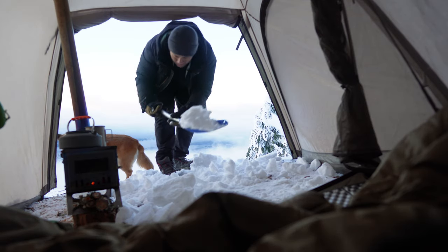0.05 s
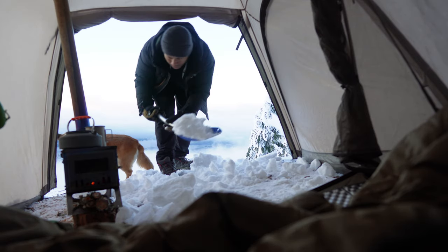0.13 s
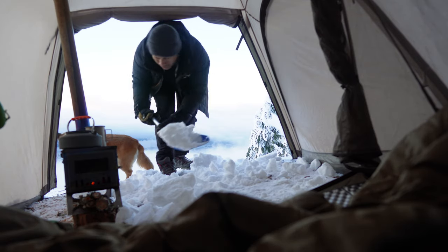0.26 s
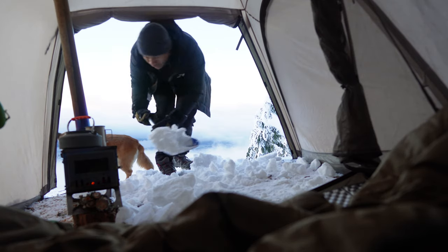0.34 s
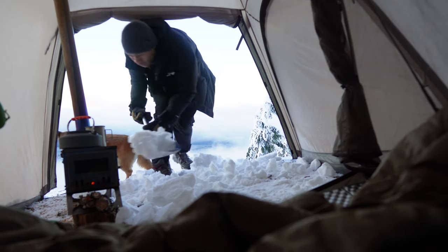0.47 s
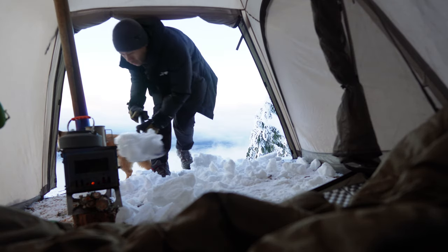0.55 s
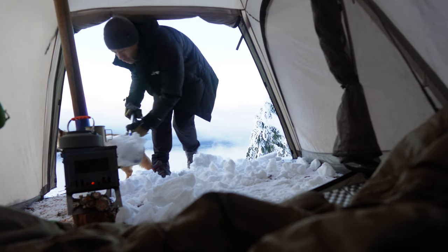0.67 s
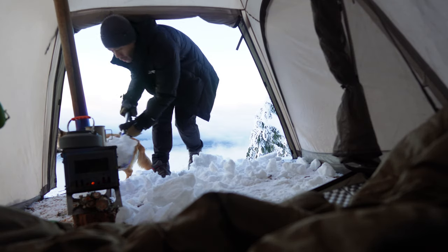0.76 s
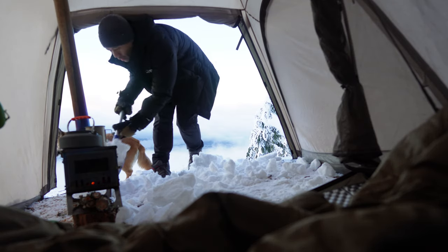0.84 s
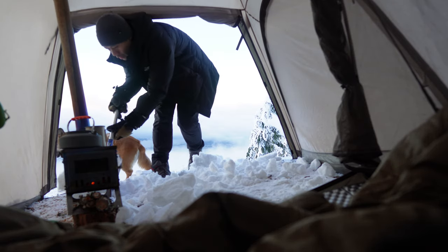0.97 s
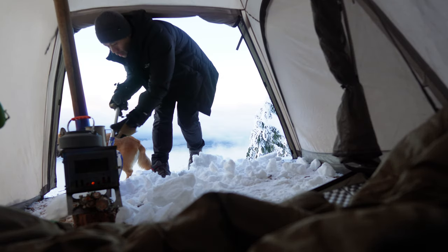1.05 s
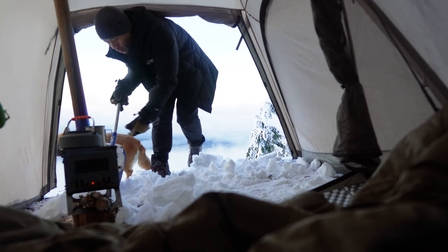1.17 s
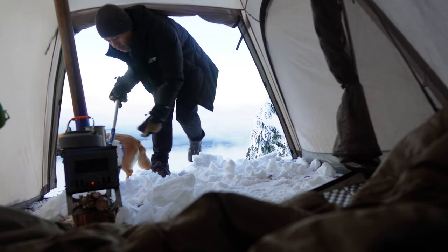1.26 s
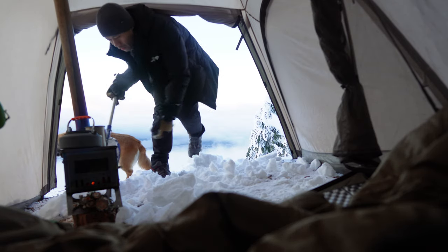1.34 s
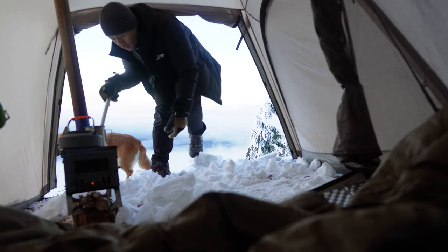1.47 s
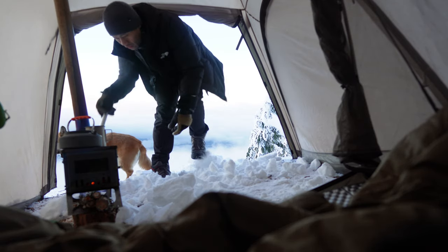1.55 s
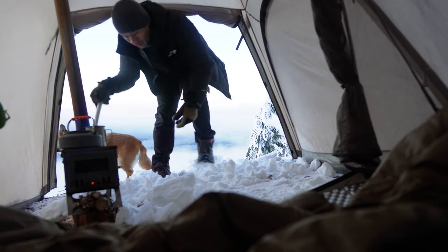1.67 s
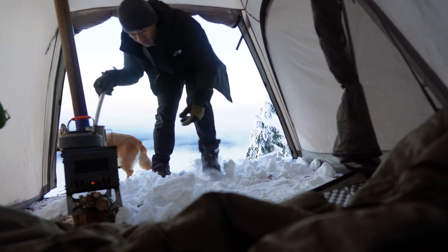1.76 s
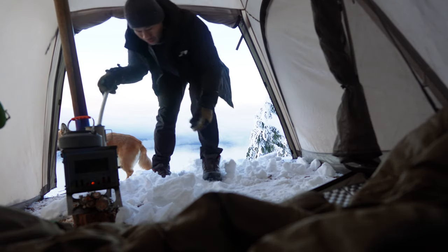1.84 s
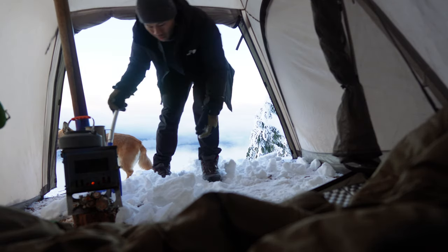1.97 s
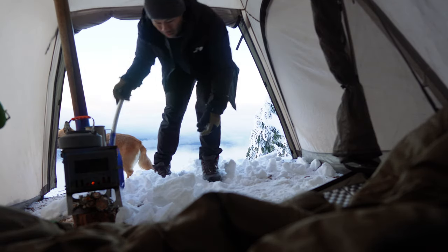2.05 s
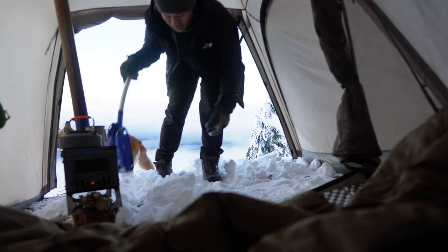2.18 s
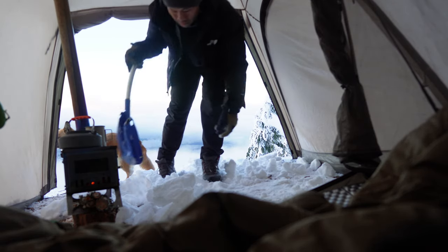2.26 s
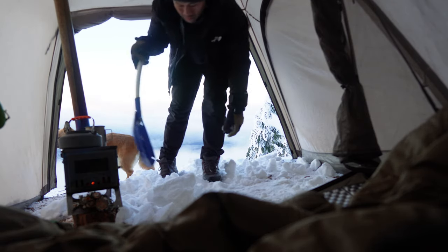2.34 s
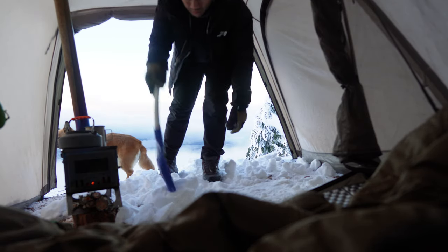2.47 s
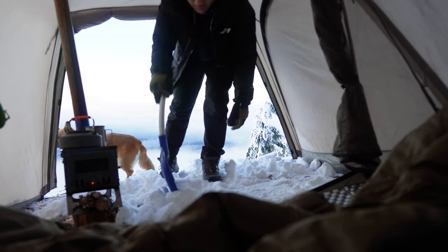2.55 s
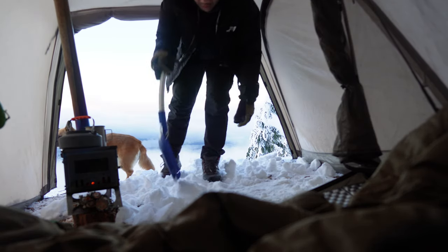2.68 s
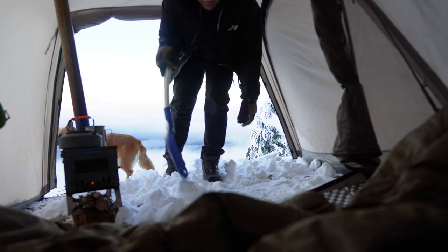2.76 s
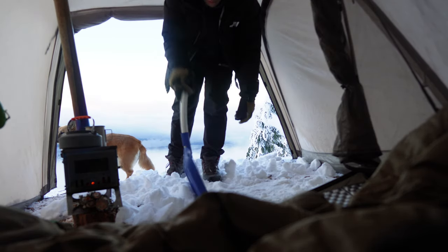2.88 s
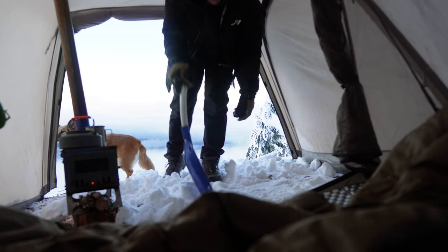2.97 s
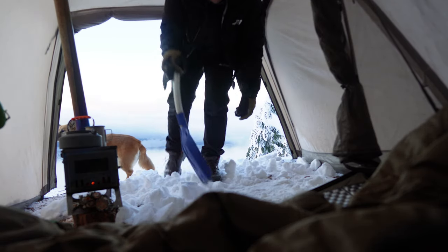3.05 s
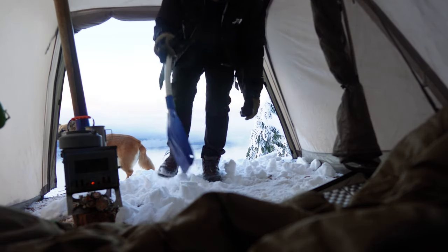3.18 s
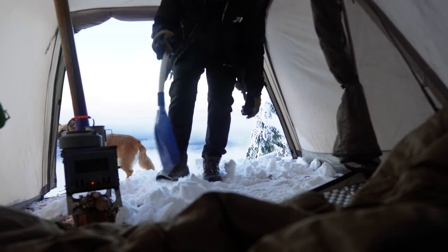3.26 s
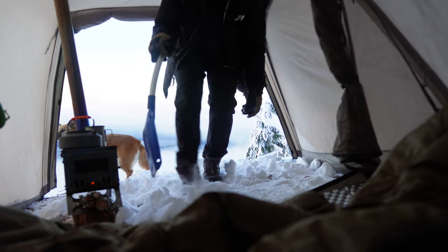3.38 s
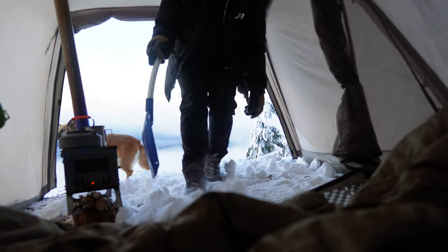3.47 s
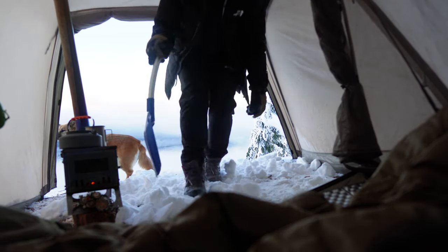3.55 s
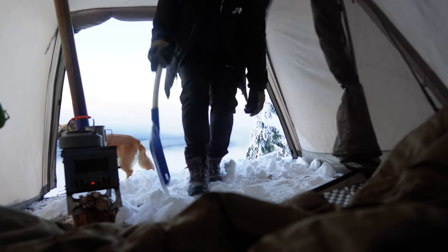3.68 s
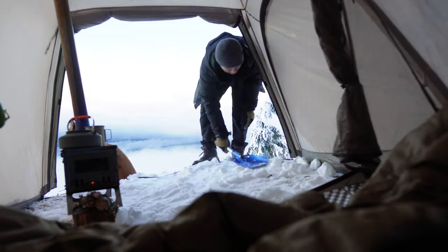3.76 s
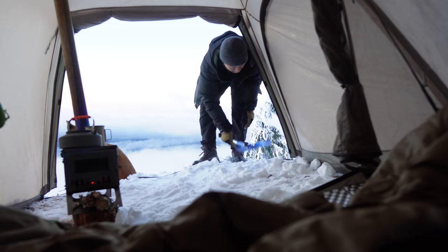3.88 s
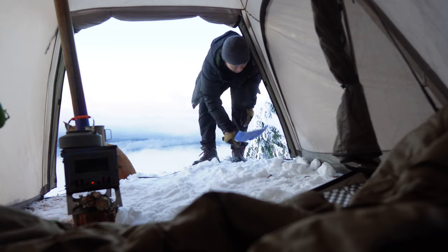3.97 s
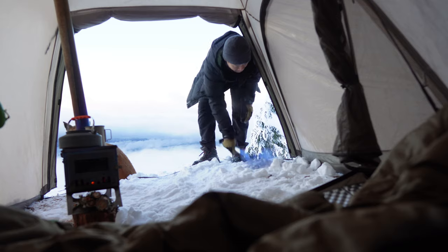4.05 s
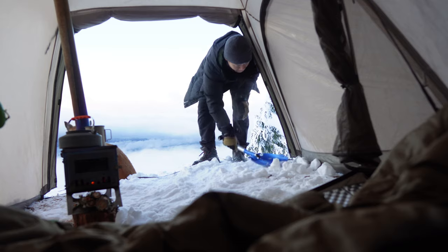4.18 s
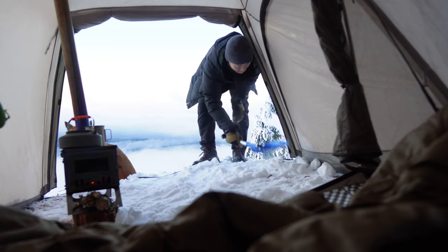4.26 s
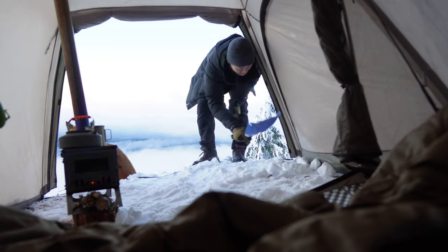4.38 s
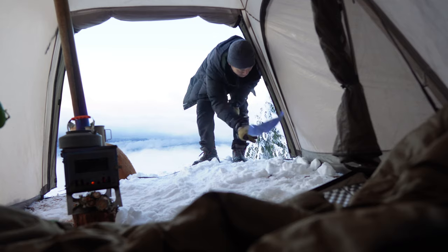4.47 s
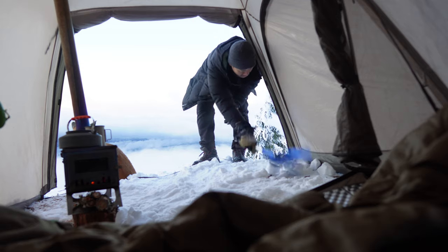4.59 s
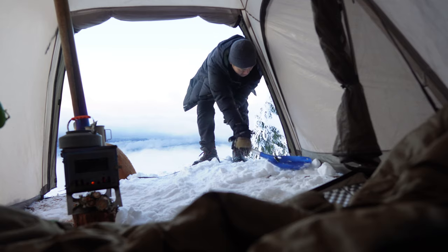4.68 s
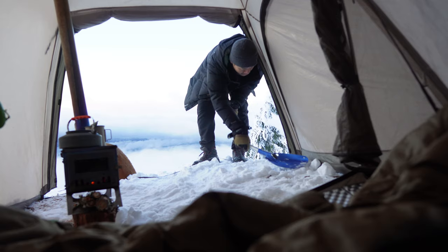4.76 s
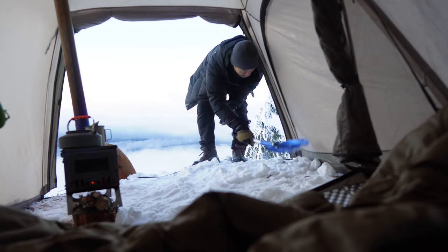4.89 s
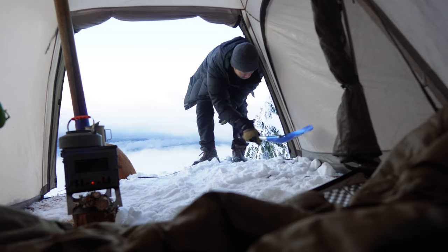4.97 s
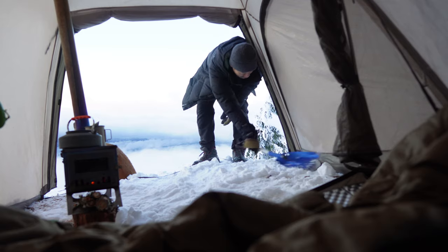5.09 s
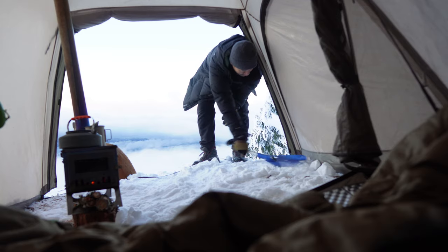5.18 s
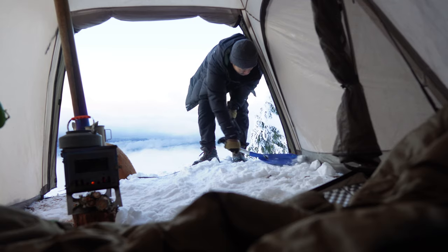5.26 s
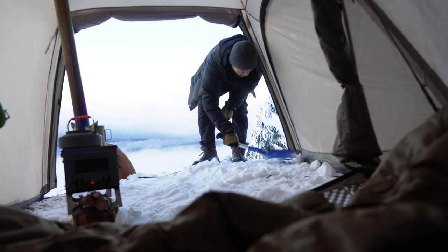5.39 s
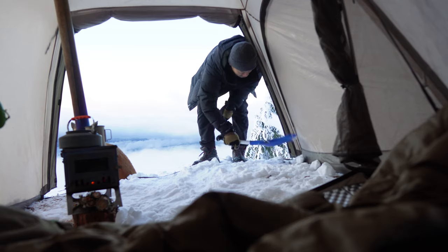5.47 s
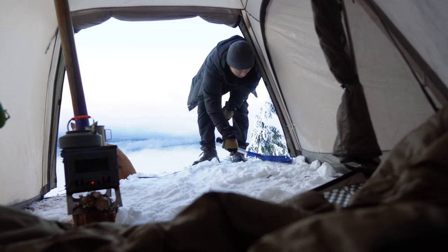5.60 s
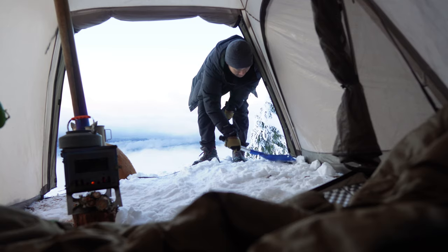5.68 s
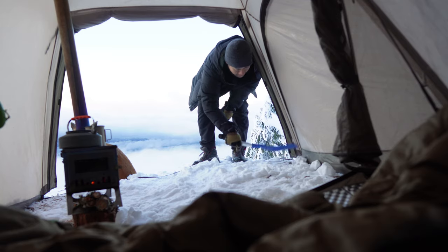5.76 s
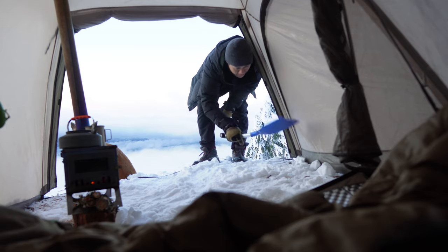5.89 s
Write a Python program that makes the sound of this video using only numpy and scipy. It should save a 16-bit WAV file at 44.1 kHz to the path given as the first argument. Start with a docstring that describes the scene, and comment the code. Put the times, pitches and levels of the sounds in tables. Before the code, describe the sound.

Inside a tent opening in winter, the first second and a half is quiet: coat rustle and soft clods landing. Then a plastic shovel bites hard snow in irregular, bright crunches, each with a short gritty scrape and a knock. A pause of rustling and boot crunches follows before faster chopping with faint shaft ring. Close microphone, dry sound, barely any air noise.

```python
"""Snow shovelling in a tent doorway

A plastic blade on a metal shaft chops packed snow: random ice clicks excite blade modes; strokes scrape and
squeak. Decaying sines ring the shaft. Filtered pats and clicks make landing clods and packing snow.
Flickering filtered clicks swish the coat, and loose crumbs tick. A short decaying-noise wash is the tent;
coloured noise is the outdoor air."""
import sys
import numpy as np
from scipy import signal
from scipy.fft import rfft, irfft, next_fast_len
from scipy.io import wavfile

SR = 44100
rng = np.random.default_rng(int(sys.argv[2]) if len(sys.argv) > 2 else 0)


def materialize(psi):
    """Save the field psi as 16-bit PCM at rate SR to the path in sys.argv[1].

    A 1-D psi becomes a single channel; in a 2-D psi each row is a channel.
    """
    bounded = np.clip(np.atleast_2d(psi).T, -1, 1)
    quanta = np.round(bounded * 32767).astype(np.int16)
    wavfile.write(sys.argv[1], SR, quanta)


N = 261513
TIME = np.arange(N) / SR

# All event levels are relative, ahead of the mix gains.
# digs, bite then slide: t/s, bite level/dB, crushing time/s, low shelf/dB, high shelf/dB,
# slide level/dB, slide level change/dB
DIG_EVENTS = [ (1.539, -25, 0.0045, 9, -2, -23.5, 2.5), (1.982, -12, 0.028, -13, 0, -17, -7),
              (2.494, -9.5, 0.027, 5, 17, -13, -9.5), (2.838, -19.5, 0.029, -6, 10, -17, -5.5),
              (3.781, -16.5, 0.022, 8, 16.5, -29, 4), (4.132, -13, 0.021, 1, 2.5, -25, 0),
              (4.674, -9, 0.019, 17, 20.5, -13, -16), (5.121, -12.5, 0.047, 10, 7, -15.5, -5.5),
              (5.650, -7, 0.0069, 5.5, 3.5, -26.5, 3.5)]
# knock on hard snow that ends each dig: t/s, level/dB, low shelf/dB, high shelf/dB
STOP_EVENTS = [(1.623, -7, 4.5, -8), (2.024, -11, -16, 1), (2.583, -17, -1, -3), (2.95, -5.5, 5.5, 10),
               (3.849, -9, 3.5, -0.5), (4.228, -12, 8, 1), (4.818, -13.5, 17, 11), (5.390, -12, 8.5, 2),
               (5.729, -15, 8, 5)]
# blade levered free with a thin crack, then drawn out: t/s, level/dB
PRY_EVENTS = [(1.654, -18), (2.047, -19.5), (2.600, -17), (2.981, -13), (4.265, -22.5), (5.452, -25.5),
              (5.77, -22.5)]
# light blade taps: t/s, level/dB, crushing time/s, low shelf/dB, high shelf/dB
TAP_EVENTS = [ (.929, -36.5, 0.014, 21, 14), (1.463, -33.5, .0024, 25, 13.5), (2.427, -27, 0.0085, 2.5, 2),
              (2.759, -29, 0.0036, -3.5, -39), (2.808, -26.5, 0.0058, 2, -39), (3.284, -22, 0.011, 0.5, -6),
              (3.563, -30, 0.021, -24.5, -9), (3.752, -24.5, 0.013, 2, 2), (3.996, -20.5, 0.012, 5, -9),
              (4.06, -34.5, 0.025, 13, 2), (4.420, -17.5, 0.0074, -9, -28), (4.516, -30.5, 0.0086, 13, -8),
              (4.614, -38, .03, 32, -10), (4.998, -29, 0.035, 18, -21), (5.07, -36.5, 0.0057, 14, -6),
              (5.262, -18.5, 0.013, 14, 20.5), (5.529, -17, 0.01, -7.5, -12)]
STOP_CRUSH_S = 0.0055


def blows():
    """Every blade strike: t/s, level/dB, crushing time/s, low shelf/dB, high shelf/dB."""
    pry_crush_s, pry_low_db, pry_high_db = 0.0073, 3, 7.5
    bites = [dig[:5] for dig in DIG_EVENTS]
    stops = [(s, db, STOP_CRUSH_S, low_db, high_db) for s, db, low_db, high_db in STOP_EVENTS]
    pries = [(s, db, pry_crush_s, pry_low_db, pry_high_db) for s, db in PRY_EVENTS]
    return bites + stops + pries + list(TAP_EVENTS)


def chops():
    """Each blow jolts the blade and crushes the crust in a dense burst of fractures."""
    # crust fracture spectrum: f/Hz, density/dB
    fracture_spectrum = [(60, -18), (250, -16), (700, -12), (1300, -0.5), (2000, -3), (3000, 1.5),
                         (5000, 6), (6300, -2), (8000, -2.5), (11000, -8.5), (16000, -18.5)]
    rise_share, rise_per_db, full_bite_db = 0.13, 0.2, -5   # rise time as a share of crushing time
    out, t = np.zeros(N), TIME[:SR // 4]
    cracks = grains(per_s=4500, spread_db=3.5)
    rows = blows()
    for k, (s, db, crush_s, low_db, high_db) in enumerate(rows):
        # lighter blows build up faster
        rise_s = rise_share * crush_s * from_db(rise_per_db * (db - full_bite_db))
        envelope = push(t, crush_s, rise_s, release_s=0.012) * np.exp(-t / 0.081)
        own_cracks = np.roll(cracks, -k * (N // len(rows)))[:len(t)]
        force = envelope * own_cracks
        body = blade(with_impact(force, impact_db=-7.5), scatter_db=1.0)
        sound = coloured(force, fracture_spectrum) + from_db(6.5) * body
        add(out, s, at_level(shelves(sound, low_db, high_db), envelope, db + 1.5))
    return out


def strokes():
    """Slides from bite to stop, and out after a pry: t/s, length/s, start level/dB, end level/dB."""
    slide_delay_s = 0.024   # after the bite
    draw_s, draw_db, draw_fade_db = 0.064, -9.5, -10   # draw_db: relative to the pry
    slides = []
    for (s, *_, db, fade_db), stop in zip(DIG_EVENTS, STOP_EVENTS):
        length_s = max(stop[0] - s - slide_delay_s, STOP_CRUSH_S)
        slides.append((s + slide_delay_s, length_s, db, db + fade_db))
    draws = [(s, draw_s, db + draw_db, db + draw_db + draw_fade_db) for s, db in PRY_EVENTS]
    return slides + draws


def scrapes():
    """The edge catches and slips on icy grains; each stroke bears on another part of the blade."""
    # slide spectrum: f/Hz, density/dB
    slide_spectrum = [(80, -18), (400, -10), (1000, -9), (1500, -5.5), (1900, -10.5), (2900, -3.5),
                      (4800, 4.5), (6300, -2.5), (8500, -5), (12000, -8.5), (16000, -23)]
    out, t = np.zeros(N), TIME[:SR // 3]
    slips = grains(per_s=9000, spread_db=2.5) * flutter(rate_hz=150, depth_db=3.0)
    for s, length_s, start_db, end_db in strokes():
        ramp = from_db(np.interp(t, [0, length_s], [start_db, end_db]))
        pressure = ramp * push(t, length_s, rise_s=0.0027, release_s=0.003)
        force = pressure * np.roll(slips, -round(s * SR))[:len(t)]
        body = shelves(blade(force, scatter_db=1.5), low_db=-4.0, high_db=5.5)
        sound = coloured(force, slide_spectrum) + from_db(4.0) * body
        add(out, s, at_level(sound, pressure, db=-1.0))
    return out


def blade(force, scatter_db):
    """Each point of contact excites the plastic blade's modes in other proportions."""
    # blade modes: f/Hz, width/Hz, level/dB
    blade_modes = [(295, 34, -4), (511, 72, -2.5), (812, 66, 0), (906, 110, -7), (1280, 5.5, -15),
                   (1363, 32, -43), (1512, 123, -9.5), (1678, 55, -6.5), (2091, 160, -3.5), (2353, 70, 6.5),
                   (2996, 173, 0.5), (3340, 52, 7.5), (3850, 97, -12), (4360, 125, 1), (4270, 73, -12),
                   (4850, 134, -9), (5700, 82, -41), (7770, 74, -4.5)]
    touch_db = rng.normal(0, 1, len(blade_modes)) * scatter_db
    out = np.zeros(len(force))
    for k, (hz, width_hz, db) in enumerate(blade_modes):
        sign = (-1) ** k
        out += sign * from_db(db + touch_db[k]) * resonance(force, hz, width_hz)
    return out


def crowded_modes(x, t60_at_3khz_s=0.036, low_hz=900, high_hz=9000, count=120):
    """The ribbed blade's many weak modes: higher ones die sooner, and each blow stirs them anew."""
    out, t = np.zeros(N), TIME[:SR // 6]
    hz = np.geomspace(low_hz, high_hz, count)[:, None] * rng.uniform(0.98, 1.015, (count, 1))
    phase = rng.uniform(0, 2 * np.pi, (count, 1))
    decay = from_db(-60 * t / t60_at_3khz_s * np.sqrt(hz / 3000))
    modes = np.sqrt(hz) * np.sin(2 * np.pi * hz * t + phase) * decay
    starts = sorted(round(s * SR) for s, *_ in blows())
    for start, end in zip(starts, starts[1:] + [N]):
        response = rng.standard_normal(count) @ modes
        response = response / np.linalg.norm(response)
        add(out, start / SR, signal.fftconvolve(x[start:end], response))
    return out


def squeaks():
    """Uneven slips of the chattering edge keep one narrow blade mode sounding for a moment."""
    # squeaks: t/s, length/s, f/Hz, level/dB
    squeak_events = [(1.655, 0.0056, 3260, -11), (2.593, 0.008, 7600, -18), (2.855, 0.15, 1504, -26),
                     (2.872, 0.079, 3034, -26), (3.158, 0.029, 2234, -36.5), (4.74, 0.01, 4370, -13.5),
                     (5.445, 0.018, 4090, -23), (5.774, 0.023, 3890, -27)]
    out, t = np.zeros(N), TIME[:SR // 5]
    for s, length_s, hz, db in squeak_events:
        envelope = push(t, length_s, rise_s=0.0013, release_s=0.0029)
        force = envelope * rng.standard_normal(len(t))
        add(out, s, at_level(resonance(force, hz, width_hz=34), envelope, db))
    return out


def shaft(db_per_blow_db=.4, favour_db=8.0, favour_width=.07):
    """Blows ring the metal tube until the next damps it; hard ones sink in and ring only a little more."""
    # shaft modes: f/Hz, t60/s, level/dB
    shaft_modes = [(560, .3, -38), (1245, .7, -37), (1524, .35, -32), (1683, .4, -34), (2313, .3, -33),
                   (2860, .28, -31), (3660, .28, -33)]
    # stuck snow damps, contact point favours a mode; interpolated: t/s, ring level/dB, favoured f/Hz
    contact_states = [(2.7, -11, 1500), (3.29, 6, 1524), (3.78, -10, 1690), (3.85, 3, 1690),
                      (4.0, -4, 1600), (4.23, -1, 1290), (4.42, -1, 1620), (4.82, 0, 1260),
                      (5.39, -3, 1650)]
    out, t = np.zeros(N), TIME[:SR]
    hz, t60_s, mode_db = np.transpose(shaft_modes)[:, :, None]
    contact_s, *columns = np.transpose(contact_states)
    hits = sorted((row[0], row[1]) for table in (DIG_EVENTS, STOP_EVENTS, TAP_EVENTS) for row in table)
    next_hits_s = [s for s, _ in hits[1:]] + [N / SR]
    for (s, db), next_s in zip(hits, next_hits_s):
        ring_db, favoured_hz = [np.interp(s, contact_s, column) for column in columns]
        favour = np.exp(-(np.log(hz / favoured_hz) / favour_width) ** 2)
        scatter_db = rng.standard_normal(hz.shape)
        start_db = db_per_blow_db * db + ring_db + mode_db + favour_db * favour + scatter_db
        modes = from_db(start_db - 60 * t / t60_s) * np.sin(2 * np.pi * hz * t)
        add(out, s, modes.sum(axis=0) * push(t, next_s - s, rise_s=0.00083, release_s=.02))
    return out


def thuds():
    """Lumps land with dull pats of various pitch and break into smaller, higher pieces."""
    # landing lumps: t/s, level/dB, f/Hz, length/s
    lump_events = [ (.094, -29.5, 440, 0.011), (0.147, -30, 485, 0.018), (.414, -22, 169, .0075),
                   (0.579, -20, 430, .0091), (1.621, -14, 264, 0.011), (2.024, -12, 181, 0.005),
                   (3.549, -28, 504, 0.015), (4.135, -2.5, 153, 0.0045), (4.675, -21, 279, 0.013),
                   (5.159, -4, 460, 0.0037), (5.162, -11.5, 134, .015), (5.183, -18, 59.6, 0.0092)]
    delay_s, piece_db, pitch_ratio, piece_s = 0.00287, -25, 2.27, 0.025   # pieces relative to their lump
    pieces = [(s + delay_s, db + piece_db, hz * pitch_ratio, piece_s) for s, db, hz, _ in lump_events]
    return soft_snow(list(lump_events) + pieces, grains(per_s=830, spread_db=5.0))


def packing_snow():
    """Spilled snow and snow under boots pack down in separate dull crunches."""
    # packing snow: t/s, level/dB, f/Hz, length/s
    packing_events = [(.36, -43, 304, 0.21), (1.845, -31.5, 456, 0.22), (2.23, -35, 423, 0.11),
                      (3.38, -32, 370, 0.016), (3.44, -29.5, 423, 0.067)]
    return soft_snow(packing_events, grains(per_s=260, spread_db=5))


def soft_snow(events, lumps):
    """Soft snow gives way with one dull pat and collapses in a few more."""
    out, t = np.zeros(N), TIME[:SR // 3]
    for s, db, hz, length_s in events:
        envelope = push(t, length_s, rise_s=0.0048, release_s=0.0048)
        crumble = envelope * np.roll(lumps, rng.integers(N))[:len(t)]
        pat_db = 20 * np.log10(0.006 / length_s)   # short thuds are mostly the pat
        force = with_impact(crumble, pat_db)
        sound = resonance(resonance(force, hz, 0.59 * hz), hz, 3 * hz)
        add(out, s, at_level(sound, envelope, db))
    return out


def movement_db():
    """How briskly the body moves: each move swells and fades over a faint rustle."""
    # rustle between moves, rising slowly to 3.76 s, then dropping quickly: t/s, level/dB
    rustle_levels = [(0, -47.5), (3.76, -41), (3.86, -49), (5.93, -47.5)]
    # coat swishes: peak t/s, level/dB, swell/s, fade/s
    swish_events = [ (.01, -30.5, .05, 0.078), (.52, -34.5, 0.63, 0.48), (1.12, -29, 0.13, 0.12),
                    (1.75, -27, .17, 0.6), (2.12, -26, 0.11, 0.23), (2.98, -33, .45, 0.32),
                    (3.40, -25, .018, 0.12), (3.76, -33.5, 0.18, 0.054), (4.2, -38.5, 0.13, 0.69),
                    (5.9, -45, 0.3, .2)]
    shape = 0.97   # 1 = pointed swell, 2 = rounded
    power = from_db(np.interp(TIME, *np.transpose(rustle_levels))) ** 2
    for s, db, swell_s, fade_s in swish_events:
        away = np.abs(TIME - s) / np.where(TIME < s, swell_s, fade_s)
        swell = from_db(db) * np.exp(-np.minimum(away, 10) ** shape)
        power = power + swell ** 2
    return 10 * np.log10(power)


def coat(swish_db, brighten_db_per_db=0.84, brisk_db=-30):
    """Cloth rubs with a fine, slightly uneven hiss that gets brighter when the movement is brisk."""
    # cloth spectrum: f/Hz, density/dB
    coat_spectrum = [(100, -1), (500, -6.5), (1000, -1), (1700, 1.5), (3200, 4.5), (5000, 3), (6300, -2.5),
                     (8000, -2), (11000, -6.5), (16000, -12.5)]
    rub = coloured(grains(per_s=13000, spread_db=2.5) * flutter(rate_hz=74, depth_db=2.0), coat_spectrum)
    treble = signal.lfilter(*signal.butter(1, 5000, "high", fs=SR), rub)
    treble_gain = from_db(brighten_db_per_db * (swish_db - brisk_db))
    return from_db(swish_db) * (rub + (treble_gain - 1) * treble)


def crumbs(stir_db, low_hz=350, high_hz=2800, count=12):
    """Loose bits of snow tumble as the body moves, with short ticks at a dozen pitches."""
    ticks = np.zeros(N)
    for hz in np.geomspace(low_hz, high_hz, count):
        clicks = grains(per_s=8.0, spread_db=3.5)
        ticks += rms_one(resonance(clicks, hz, hz / 4)) / np.sqrt(hz)
    return from_db(.5 * stir_db - 31.0) * rms_one(ticks)


def tent(x, t60_s=0.17, gap_s=0.0073):
    """Canvas and snow return only a short, weak, dull wash."""
    t = TIME[:SR // 2]
    tail = rng.standard_normal(len(t)) * from_db(-60 * t / t60_s) * (t > gap_s)
    dull = shelves(x, low_db=-2, high_db=-28.0)
    wash = signal.fftconvolve(dull, tail / np.linalg.norm(tail))[:N]
    return from_db(-18.5) * np.std(x) * rms_one(wash)


def outdoor_air(level_db=-49):
    """Faint steady outdoor air: white noise through a spectrum weighted to the bass."""
    # air spectrum: f/Hz, density/dB
    air_spectrum = [(24, -4), (45, -3), (100, 4), (250, -4), (700, -17.5), (2400, -21), (5000, -22.5),
                    (16000, -25.5)]
    return from_db(level_db) * coloured(rng.standard_normal(N), air_spectrum)


def grains(per_s, spread_db):
    """Ice bonds snap at random: many small clicks, a few large ones; rms 1."""
    sizes = from_db(spread_db * np.minimum(rng.exponential(1, N), 4))
    signs = rng.choice([-1, 1], N)
    return rms_one(sizes * signs * (rng.random(N) < per_s / SR))


def push(t, length_s, rise_s, release_s):
    """Force builds up, holds while the snow gives way, then lets go."""
    return (1 - np.exp(-t / rise_s)) * np.exp(-np.maximum(t - length_s, 0) / release_s)


def with_impact(crumble, impact_db):
    """Add one solid first touch, 1 ms in; its energy is relative to the crumble's."""
    touch = signal.unit_impulse(len(crumble), round(SR / 1000))
    return crumble + touch * np.linalg.norm(crumble) * from_db(impact_db)


def flutter(rate_hz, depth_db):
    """A gain that wanders between random values, rate_hz of them a second."""
    knots = rng.standard_normal(N // 16)
    return from_db(depth_db * np.interp(TIME * rate_hz, np.arange(len(knots)), knots))


def resonance(x, hz, width_hz):
    """Two-pole resonance with gain 1 on top."""
    r = np.exp(-np.pi * width_hz / SR)
    zeros = np.array([1, 0, -1]) * (1 - r * r) / 2
    poles = [1, -2 * r * np.cos(2 * np.pi * hz / SR), r * r]
    return signal.lfilter(zeros, poles, x + 1e-18)


def coloured(x, spectrum):
    """Causal (minimum-phase) filter that follows a spectrum; keeps the power of white noise."""
    size = 2 * next_fast_len(len(x) // 2 + 2048)
    hz, db = np.transpose(spectrum)
    bins_hz = np.arange(size // 2 + 1) * SR / size
    gain = rms_one(from_db(np.interp(np.log(bins_hz + 1), np.log(hz), db)))
    # fold the cepstrum onto positive time for minimum phase
    cepstrum = irfft(np.log(gain))
    cepstrum[1:size // 2] *= 2
    cepstrum[size // 2 + 1:] = 0
    return irfft(rfft(x, size) * np.exp(rfft(cepstrum)))[:len(x)]


def shelves(x, low_db, high_db, low_hz=1100, high_hz=4500):
    """Raise or lower the bass and the treble."""
    low = signal.lfilter(*signal.butter(1, low_hz, fs=SR), x)
    high = signal.lfilter(*signal.butter(1, high_hz, "high", fs=SR), x)
    return x + (from_db(low_db) - 1) * low + (from_db(high_db) - 1) * high


def at_level(sound, envelope, db):
    """Give a sound the energy of its envelope played at db."""
    return rms_one(sound) * np.sqrt(np.mean(envelope ** 2)) * from_db(db)


def from_db(db):
    """Decibels to amplitude ratio."""
    return 10 ** (np.asarray(db) / 20)


def rms_one(x):
    """Scale to rms 1."""
    return x / np.sqrt(np.mean(x ** 2) + 1e-20)


def add(out, s, sound):
    """Mix a sound in from time s on."""
    start = max(0, round(s * SR))
    out[start:start + len(sound)] += sound[:max(0, N - start)]


def scene():
    """Shovel, snow and coat in the tent doorway, over faint outdoor air."""
    contact, moving_db = chops() + scrapes(), movement_db()
    shovel = contact + from_db(-5) * crowded_modes(contact) + squeaks() + shaft()
    work = shovel + thuds() + packing_snow() + coat(moving_db) + crumbs(moving_db)
    return (from_db(-2.5) * work + tent(work) + outdoor_air())[None]


def record(dry):
    """The loudest peaks are rounded and the top is cut."""
    ceiling, cutoff_hz = 0.71, 15900
    low_pass = signal.ellip(12, .2, 80, cutoff_hz, fs=SR, output="sos")
    return signal.sosfilt(low_pass, ceiling * np.tanh(dry / ceiling))


dry = scene()
out = record(dry)
materialize(out)
```